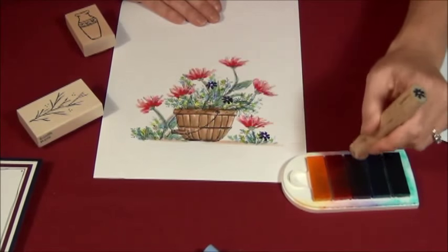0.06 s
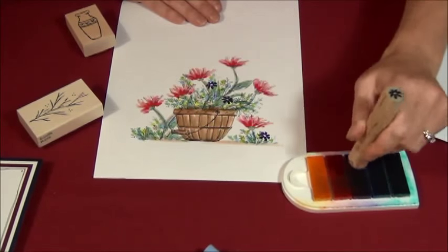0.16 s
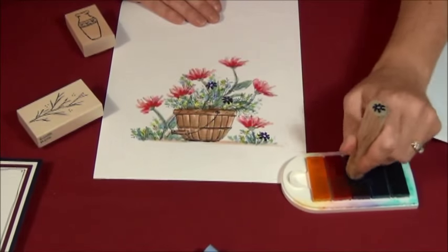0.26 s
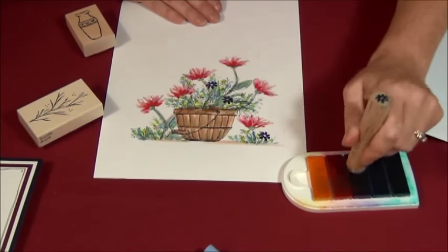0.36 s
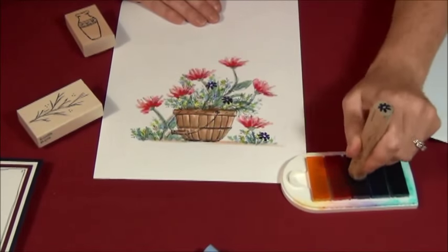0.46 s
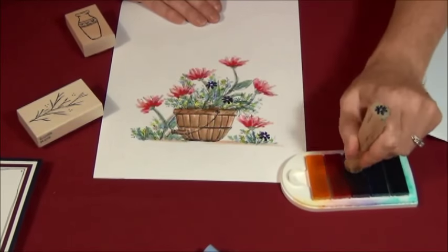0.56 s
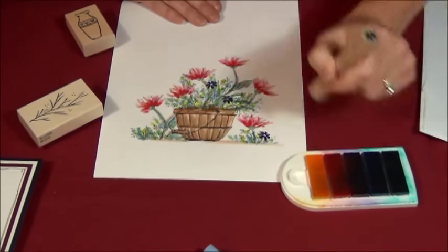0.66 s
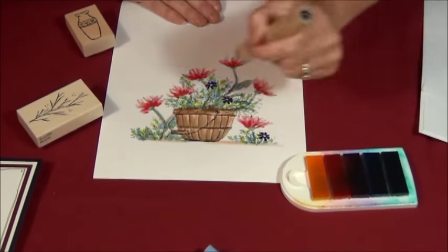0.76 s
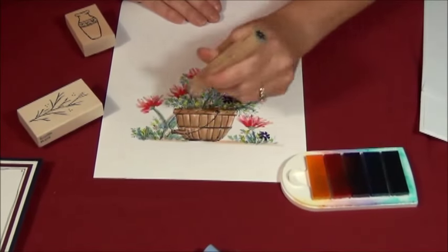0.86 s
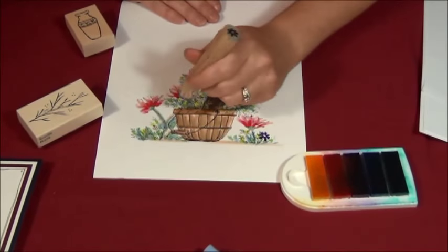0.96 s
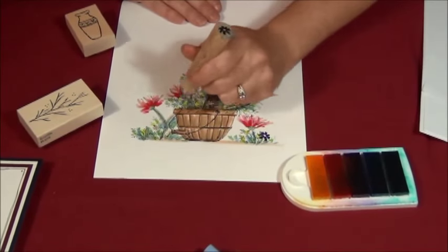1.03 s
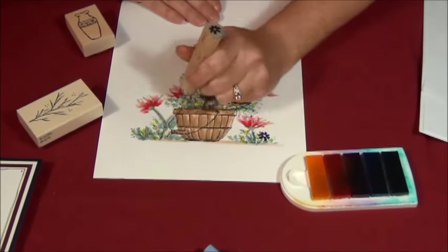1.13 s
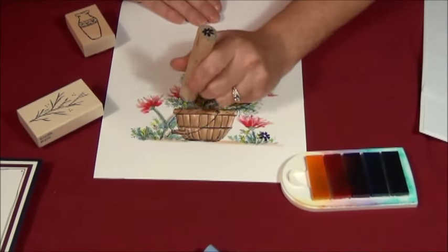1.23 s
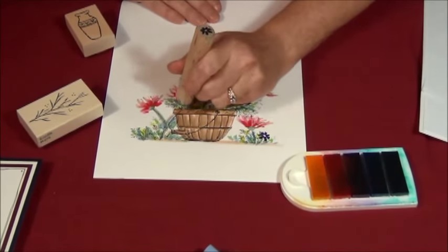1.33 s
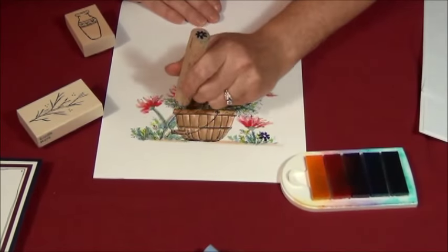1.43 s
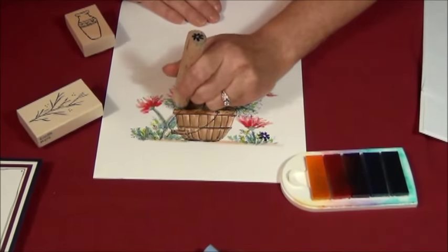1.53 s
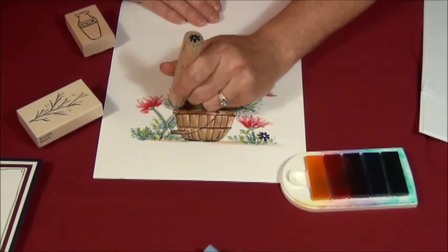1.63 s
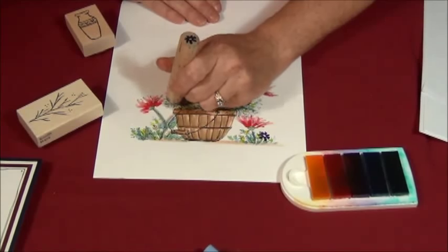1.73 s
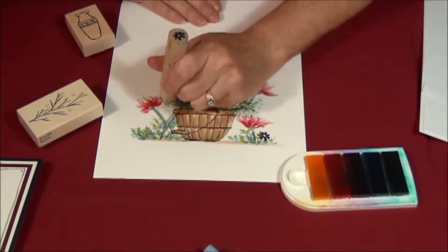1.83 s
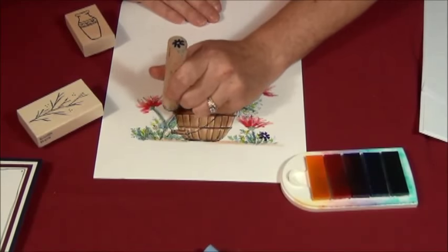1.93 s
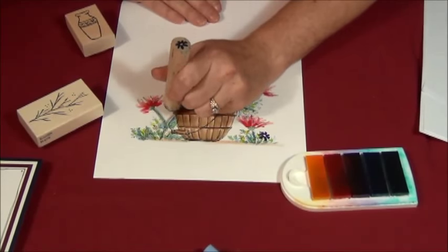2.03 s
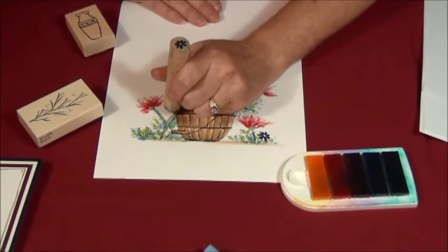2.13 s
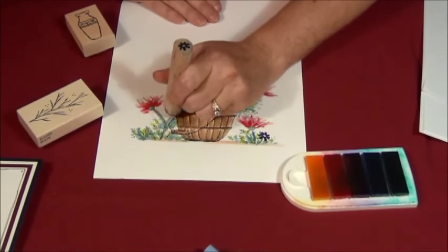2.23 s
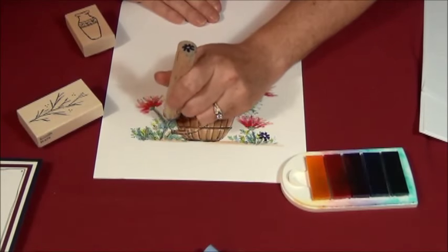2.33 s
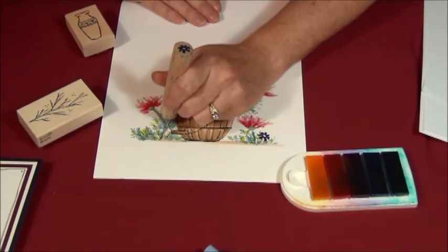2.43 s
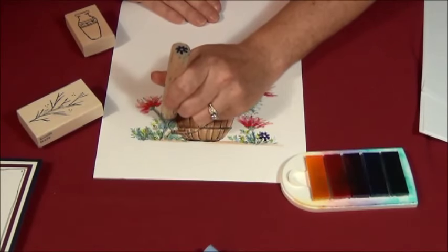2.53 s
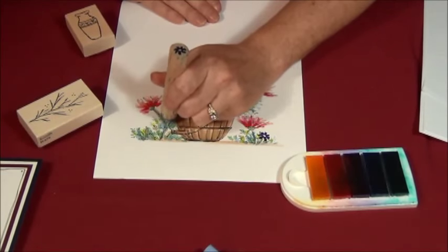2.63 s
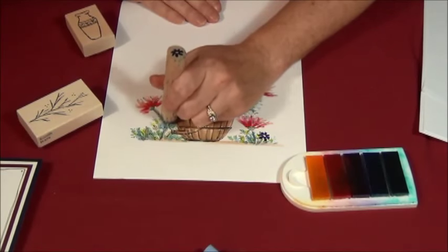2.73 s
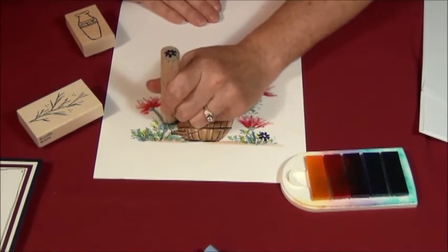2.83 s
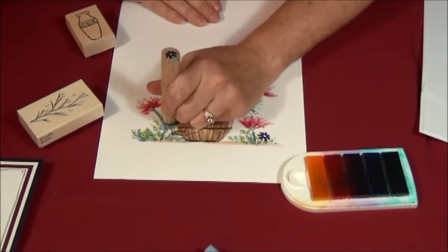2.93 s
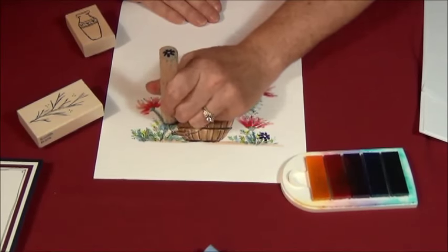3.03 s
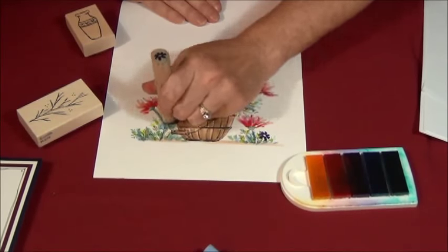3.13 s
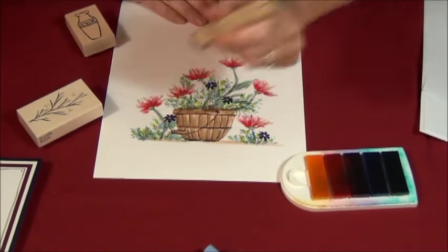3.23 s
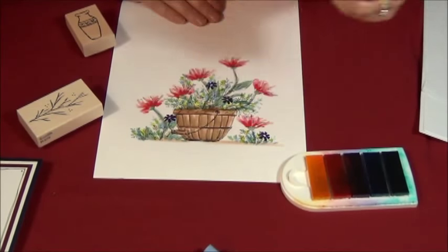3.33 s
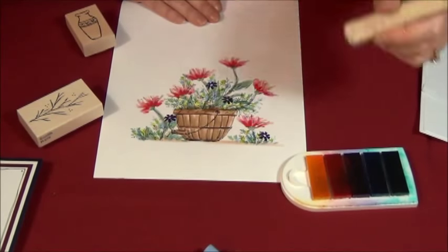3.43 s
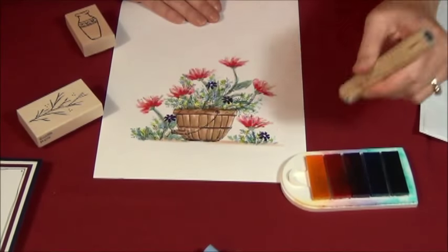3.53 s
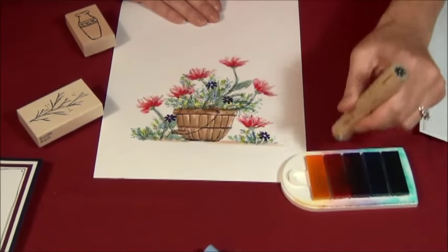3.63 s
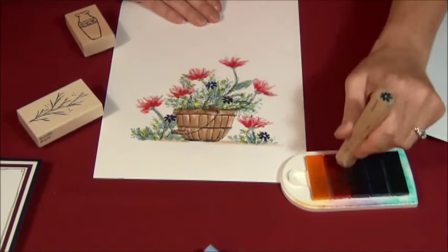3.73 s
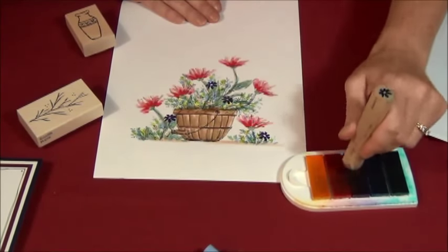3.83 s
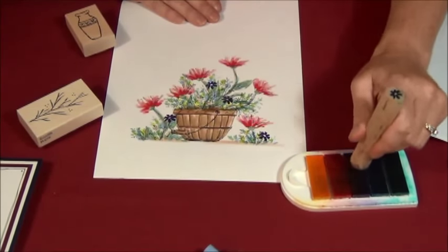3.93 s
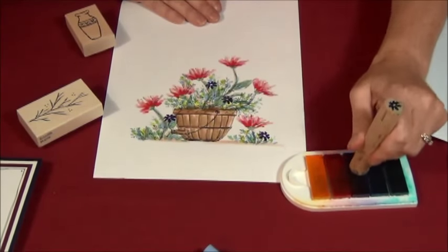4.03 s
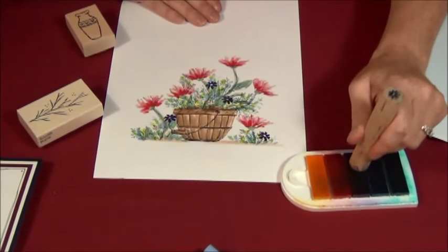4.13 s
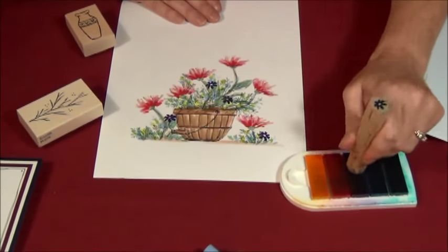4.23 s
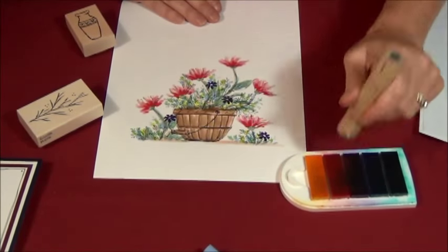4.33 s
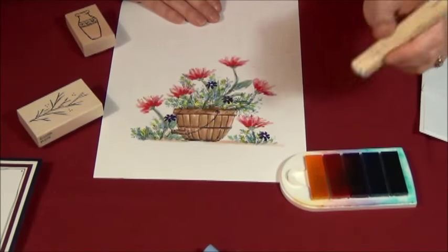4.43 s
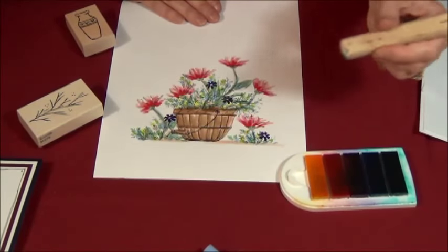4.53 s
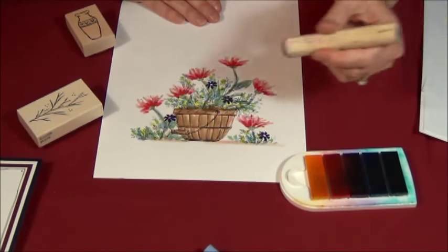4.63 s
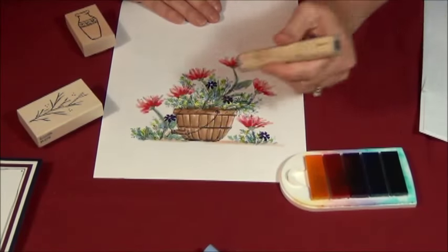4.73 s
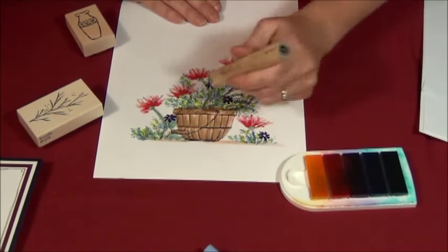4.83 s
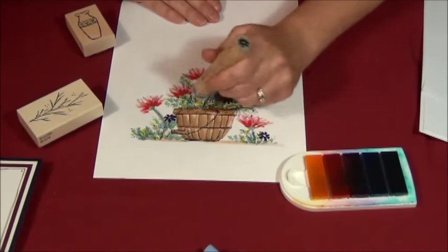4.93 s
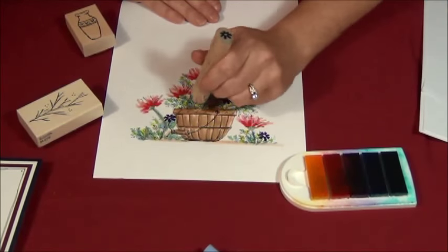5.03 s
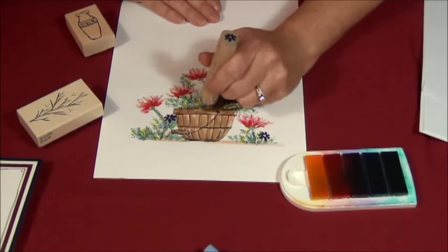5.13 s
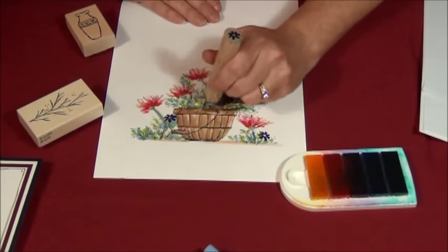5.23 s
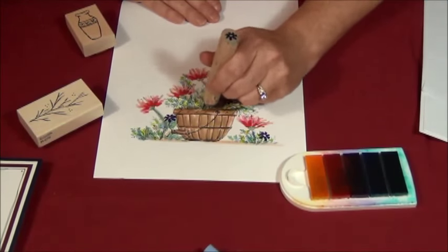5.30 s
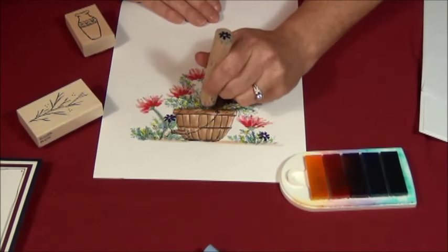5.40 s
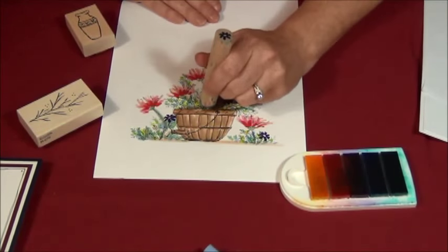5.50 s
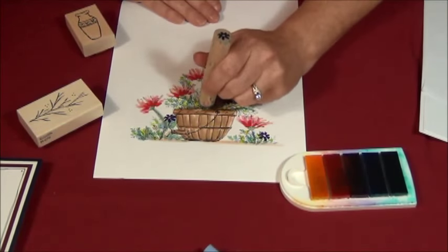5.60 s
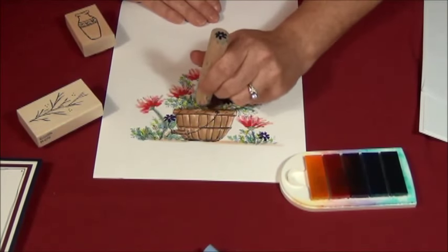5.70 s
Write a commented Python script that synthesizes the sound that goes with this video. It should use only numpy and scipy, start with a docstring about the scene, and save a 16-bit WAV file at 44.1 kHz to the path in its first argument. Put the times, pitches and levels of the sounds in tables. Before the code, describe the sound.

A small wooden stamp taps twice on an ink pad, making its plastic case clack sharply against the table. The stamp is then rocked on card with soft, dull thuds and faint rubbing, and peels off with tiny sticky snaps. Two more quick clacks on the pad follow. The sounds are close, in a small room with a faint electrical hum and ventilation.

```python
"""A small wooden stamp is tapped twice on an ink pad, rocked on a card, peeled off and inked twice more.
Each tap makes the pad's plastic case clack on the table; the tabletop thuds and a small room answers.
Rubber and hand rub softly, and tacky ink snaps as the stamp leaves the card.
Mains hum and ventilation lie underneath; an automatic gain control ducks at the taps and creeps back."""
import sys
import numpy as np
from scipy import signal
from scipy.fft import rfft, irfft, next_fast_len
from scipy.io import wavfile
from scipy.ndimage import uniform_filter1d, minimum_filter1d, map_coordinates

SR = 44100
rng = np.random.default_rng(int(sys.argv[2]) if len(sys.argv) > 2 else 0)


def wav_record(signal):
    """Record a signal, one row per channel, as 16-bit PCM in the file named by sys.argv[1]."""
    frames = np.transpose(np.atleast_2d(signal))
    bounded = np.clip(frames, -1, 1)
    # unit amplitude maps onto the largest positive 16-bit level
    quanta = np.round(bounded * 32767).astype(np.int16)
    wavfile.write(sys.argv[1], SR, quanta)


N = 254016
TIME = np.arange(N) / SR
AGE = TIME[:8192]  # time since a strike [s]

# taps on the ink pad: (time [s], relative level [dB], first touch offset [dB], final slap offset [dB],
# thud centre [Hz], hold until lift [s], relative lift level [dB])
TAPS = [(0.3306, -4.5, -1, 2.5, 140, 0.085, -41), (0.5221, -1.5, -13, -2.5, 144, .098, -35),
        (4.0616, -4, -2.5, 3.5, 225, .092, -46), (4.2467, -1.5, -3, -1.5, 230, 0.087, -32.5)]
# presses on the card, the last one the hand landing by the pad: (time [s], relative level [dB], push centre
# [Hz], # board ring offset [dB], gap between pushes [s], loss per push [dB])
PRESSES = [(2.0292, -23, 255, -2.5, .0085, 5), (2.078, -30, 646, -6, .006, 1.3),
           (2.256, -34.5, 646, -5.5, .008, 2), (2.680, -32.5, 600, -4.5, 0.0065, 6),
           (2.921, -32, 270, 2.5, .008, 10), (3.364, -35, 500, -3, 0.0066, 8),
           (3.687, -26, 280, 0.5, 0.019, 4)]
SETTLED_HZ = 287  # the pushes of a press tend to this centre


def amp(db):
    """Decibels to gain."""
    return 10 ** (np.asarray(db) / 20)


def unit(x):
    """Scale to rms 1."""
    return x / np.sqrt(np.mean(x ** 2) + 1e-20)


def blow(x):
    """Scale to the energy of 1 ms at full level."""
    return x * np.sqrt(SR * 1e-3 / (np.sum(x ** 2) + 1e-20))


def fade(t60_s):
    """Exponential decay, 60 dB down at t60_s."""
    return np.exp(-np.log(1000) * AGE / t60_s)


def along(points, hz):
    """Interpolate (frequency [Hz], value) points on a log axis."""
    points_hz, values = np.transpose(points)
    return np.interp(np.log(hz + 1), np.log(points_hz), values)


def band(hz, centre_hz, steepness_db):
    """Broad hump [dB] around a centre frequency."""
    ratio = (hz + 1) / centre_hz
    return -steepness_db * np.log10(1 + (ratio - 1 / ratio) ** 2)


def filtered(x, response):
    """Multiply the spectrum by a function of frequency."""
    n = x.shape[-1]
    size = next_fast_len(n + SR // 4)
    return irfft(rfft(x, size) * response(np.fft.rfftfreq(size, 1 / SR)), size)[..., :n]


def coloured(x, level_db):
    """Minimum-phase filter from a dB curve: attacks stay sharp."""
    n = 2 * next_fast_len(len(x) // 2 + 1)
    cepstrum = irfft(np.log(amp(level_db(np.fft.rfftfreq(n, 1 / SR))) + 1e-6))
    cepstrum[1:n // 2] *= 2
    cepstrum[n // 2 + 1:] = 0
    return irfft(rfft(x, n) * np.exp(rfft(cepstrum)))[:len(x)]


def delayed(x, s):
    """Fractional-sample delay."""
    return filtered(x, lambda hz: np.exp(-2j * np.pi * hz * s))


def add(track, s, sound):
    """Mix a sound into the track at time s."""
    part = track[round(s * SR):][:len(sound)]
    part += sound[:len(part)]


def diffuse(pair):
    """Two unrelated noises become sound from all around, as two close microphones hear it."""
    # diffuse field: (frequency [Hz], left-right correlation [0..1])
    correlation = [(60, 1), (290, 0.87), (640, 0.68), (1410, 0.41), (3100, 0.57), (6820, 0.55),
                   (15000, 0.95)]
    angle = lambda hz: np.arccos(np.clip(along(correlation, hz), 0, 1)) / 2
    mid, side = filtered(pair, lambda hz: np.array([np.cos(angle(hz)), np.sin(angle(hz))]))
    return np.array([mid + side, mid - side])


def crack(t60_s, scatter_db):
    """One sharp push, then a dense, short ring."""
    push = blow(signal.unit_impulse(len(AGE)))
    return push + amp(scatter_db) * blow(rng.standard_normal(len(AGE)) * fade(t60_s))


def ring(modes, spread_db):
    """Damped modes of alternating sign, struck at slightly random strengths."""
    out = np.zeros(len(AGE))
    for k, (hz, db, t60_s) in enumerate(modes):
        strength = (-1) ** k * amp(db + spread_db * rng.standard_normal())
        out += strength * fade(t60_s) * np.sin(2 * np.pi * hz * AGE)
    return blow(out)


def ventilation():
    """Steady air noise through duct resonances."""
    # air noise spectrum: (frequency [Hz], relative level [dB])
    spectrum = [(25, -13.5), (60, -7), (170, -2), (330, -1.5), (480, -4.5), (750, -3.5), (950, -2.5),
                (1150, -3.5), (1400, -10), (2200, -12), (3150, -10), (4200, -15.5), (8000, -17),
                (15500, -19.5)]
    # duct resonances: (centre [Hz], width [Hz], boost [dB])
    resonances = [(905, 33, 3), (3145, 65, 5)]
    duct_db = lambda hz: sum(db / (1 + (2 * (hz - centre) / width) ** 2)
                             for centre, width, db in resonances)
    noise = diffuse(rng.standard_normal((2, N)))
    air = unit(filtered(noise, lambda hz: amp(along(spectrum, hz) + duct_db(hz))))
    return amp([[-44.5], [-44]]) * air


def mains_hum():
    """Hum lines and a thin electronic whine, wavering slightly in level and phase."""
    # hum and whine lines: (frequency [Hz], relative level [dB])
    lines = [(60, -66), (119.8, -53), (189.5, -59), (240, -54.5), (300, -47), (360.2, -56.5), (540.5, -63),
             (617, -58), (905, -59.5), (933, -58), (15734.3, -62)]

    def wobble(rate_hz):
        return map_coordinates(rng.standard_normal(int(N * rate_hz / SR) + 4), [TIME * rate_hz])

    out = np.zeros(N)
    for hz, db in lines:
        peak = np.sqrt(2) * amp(db + 1.2 * wobble(rate_hz=5.05))
        phase = 2 * np.pi * (hz * TIME + rng.random()) + 0.16 * wobble(rate_hz=5.6)
        out += peak * np.sin(phase)
    return amp(-3) * out


def case_contacts(flat_s=0.0029, skip_s=0.0052, slap_s=0.0066, rattle_gap_s=0.016):
    """Taps rock the case over its corners, lifts rattle it: (time [s], level [dB], tilt [dB/octave])."""
    for s, db, touch_db, slap_db, _, hold_s, lift_db in TAPS:
        yield s, db + touch_db, 1.1
        yield s + flat_s, db, -0.6
        yield s + skip_s, db - 6.5 - slap_db, 1.2  # the skip takes what the slap does not
        yield s + slap_s, db + slap_db, 3.5 + 1.27 * slap_db  # harder is brighter
        for k in (-1, 0, 1):
            rattle_s = s + hold_s + rattle_gap_s * (k + rng.uniform(-0.25, 0.25))
            yield rattle_s, lift_db + rng.normal(1, 1.3), -5


def ink_pad():
    """Every contact cracks the shell of the light plastic case and rings its modes."""
    # case modes: (frequency [Hz], relative level [dB], t60 [s])
    modes = [(1293, -7, 0.05), (1408, -6, 0.065), (2670, -1.5, 0.08), (3520, -2, 0.024), (3790, 5, 0.028),
             (4360, -6, .035), (4700, -9, 0.037), (5480, -4, .045), (6270, 4, 0.044), (6800, -18, 0.081),
             (8100, -2, 0.034), (10640, 7, 0.02)]
    # shell crack spectrum: (frequency [Hz], relative level [dB])
    spectrum = [(60, -25), (250, -6.5), (800, -8.5), (1300, -6.5), (1950, -9.5), (3100, 1.5), (4000, 0.5),
                (6500, -4.5), (8200, -3.5), (9500, -7.5), (11800, -7.5), (13200, -21), (16000, -15.5)]
    out = np.zeros(N)
    case_ring = amp(-15.5) * ring(modes, spread_db=2.0)
    for s, db, tilt_db_per_octave in case_contacts():
        colour_db = lambda hz: along(spectrum, hz) + tilt_db_per_octave * np.log2(hz.clip(1500, 11000))
        shell = blow(coloured(crack(t60_s=0.0081, scatter_db=3), colour_db))
        add(out, s, amp(db) * (shell + case_ring))
    return amp(3.5) * out


def table_pushes(settle_share=0.61):
    """One push per tap, four fading ones per press: (time [s], level [dB], centre [Hz], ring [dB])."""
    for s, db, _, _, thud_hz, _, _ in TAPS:
        yield s + 0.00042, db - 12.5, thud_hz, 3.4
    for s, db, centre_hz, ring_db, gap_s, loss_db in PRESSES:
        for k in range(4):
            push_hz = SETTLED_HZ * (centre_hz / SETTLED_HZ) ** (settle_share ** k)
            yield s + k * gap_s, db - k * loss_db, push_hz, ring_db


def tabletop(cutoff_hz=1050):
    """A cushioned push thuds and rings the board; the softer the contact, the lower the thud."""
    # board modes: (frequency [Hz], relative level [dB], t60 [s])
    modes = [(92, -8.5, 0.063), (134.6, 1, 0.11), (166, -9.5, 0.21), (240.6, -8, 0.17), (287.4, 1, 0.092),
             (339.4, 0.5, 0.11), (458.4, -3, 0.13), (638, -1.5, 0.12), (805, -26, 0.035), (990, -2, 0.052)]
    lowpass_db = lambda hz: -10 * np.log10(1 + (hz / cutoff_hz) ** 4)
    out = np.zeros(N)
    for s, db, centre_hz, ring_db in table_pushes():
        knock = blow(coloured(crack(t60_s=0.072, scatter_db=5), lowpass_db))
        board = knock + amp(ring_db) * ring(modes, spread_db=-0.5)
        thud = blow(coloured(board, lambda hz: band(hz, centre_hz, steepness_db=9.0)))
        add(out, s, amp(db) * thud)
    return amp(7.0) * out


def slides(scuff_s=0.008):
    """Rubs, scuffs, scrapes and sways: (mid time [s], length [s], level [dB], centre [Hz])."""
    # rubber and hand on card and cloth: (mid time [s], length [s], level [dB], centre [Hz])
    rubs = [(0.916, 0.045, -49.5, 8000), (1.8, 0.24, -48, 447), (1.81, 0.044, -51.5, 7000),
            (2.04, 0.076, -50, 60), (2.877, .06, -53, 65), (5.23, 0.11, -50, 7960)]
    yield from rubs
    for s, db, centre_hz, *_ in PRESSES:
        scuff_db = db - 20.5 + 8 * np.log2(centre_hz / SETTLED_HZ)  # a harder, higher push scuffs louder
        yield s + scuff_s / 2, scuff_s, scuff_db, 1770  # the rubber lands
    for s, *_, hold_s, lift_db in TAPS:
        yield s + hold_s, 0.054, lift_db - 6, 2240  # the case scrapes at the lift
        yield s + hold_s, 0.068, -46, 36  # the table sways back


def rubbing():
    """Each slide is a swell of fine grains: hiss on paper, rumble where the hand drags the table."""
    out = np.zeros(N)
    t = TIME[:SR // 2]
    for s, length_s, db, centre_hz in slides():
        grains = rng.standard_normal(len(t)) * rng.exponential(size=len(t))
        friction = unit(coloured(grains, lambda hz: band(hz, centre_hz, steepness_db=12.5)))
        swell = np.exp(-2 * ((t - t.mean()) / length_s) ** 2)
        add(out, s - t.mean(), amp(db) * friction * swell)
    return out


def sticky_ink(threads=3, gap_s=0.0039, step_db=7.5):
    """Ink threads break in a quick crescendo of dry snaps as the rubber peels off the card."""
    # last, loudest snap of each peel: (time [s], level [dB])
    snaps = [(1.9856, -37), (2.8425, -38), (3.11, -35), (3.2387, -22)]
    # snap spectrum: (frequency [Hz], relative level [dB])
    spectrum = [(100, -19), (1000, -12), (2000, -5.5), (3300, 2), (6000, -9.5), (11000, -7), (13000, -9),
                (16000, -27.5)]
    out = np.zeros(N)
    for s, db in snaps:
        for k in range(threads):
            snap = blow(coloured(crack(t60_s=0.021, scatter_db=-1.5), lambda hz: along(spectrum, hz)))
            add(out, s - k * gap_s, amp(db - k * step_db) * snap)
    return out


def room(x, block=SR // 2):
    """Diffuse tail, new each block as the hand moves; it builds quickly and dies fastest in the treble."""
    # room decay: (frequency [Hz], t60 [s])
    decay_times = [(100, 0.41), (700, 0.35), (2000, 0.29), (4800, 0.31), (8000, 0.22), (13000, 0.21)]
    # tail spectrum: (frequency [Hz], relative level [dB])
    spectrum = [(100, -8), (400, 1), (1500, 4.5), (3500, -2), (8000, -2), (13000, -6.5)]
    build_up = 1 - np.exp(-TIME[:block] / 0.0043)
    near_walls = 1 + 0.5 * np.exp(-TIME[:block] / 0.04)
    out = np.zeros((2, N))
    for start in range(0, N, block):
        part = x[None, start:start + block]
        if not part.any():
            continue
        hz, t, noise = signal.stft(rng.standard_normal((2, block)), SR, nperseg=256)
        decay = np.exp(-np.log(1000) * t / along(decay_times, hz)[:, None])
        colour = amp(along(spectrum, hz))[:, None]
        tail = signal.istft(noise * decay * colour, SR)[1][:, :block] * build_up * near_walls
        tail /= np.linalg.norm(tail[0])
        for track, sound in zip(out, signal.fftconvolve(part, tail, axes=1)):
            add(track, start / SR, sound)
    return out


def clack_reverb(directions=3):
    """The case sends a different ring in each direction; the room blends them into one smooth tail."""
    return sum(room(ink_pad()) for _ in range(directions)) / np.sqrt(directions)


def gain_control(x, ceiling_db, start_db, recovery_db_per_s):
    """The gain drops just ahead of a loud sound and climbs back slowly."""
    power = np.abs(uniform_filter1d(np.mean(x ** 2, axis=0), size=600))
    headroom_db = ceiling_db - 10 * np.log10(power + 1e-12)
    allowed_db = minimum_filter1d(np.minimum(headroom_db, 0), size=900)
    allowed_db[0] = start_db
    climb_db = recovery_db_per_s * TIME
    gain_db = np.minimum.accumulate(allowed_db - climb_db) + climb_db
    return x * amp(uniform_filter1d(gain_db, size=200))


def limiter(x, ceiling_db):
    """Turn down the loudest milliseconds."""
    level = np.sqrt(np.abs(uniform_filter1d(np.mean(x ** 2, axis=0), size=90)))
    gain = np.minimum(amp(ceiling_db) / (level + 1e-9), 1)
    return x * uniform_filter1d(gain, size=60)


def scene():
    """Pad slightly right, card in the middle; a near wall echoes once."""
    pad = ink_pad()
    card = tabletop() + sticky_ink() + rubbing()
    direct = np.array([amp(-1.0) * delayed(pad, s=5e-6), amp(1.0) * pad]) + card
    wall_echo = amp(-13.5) * delayed(pad + card, s=0.0097)
    tails = diffuse(amp(-11.5) * clack_reverb() + amp(-12.0) * room(card))
    return direct + wall_echo + tails + ventilation() + mains_hum()


def record(dry):
    """Gain control, limiter, soft clip and a steep low-pass."""
    cutoff_hz = 15920
    x = gain_control(dry, ceiling_db=-13.0, start_db=-3, recovery_db_per_s=2.5)
    x = limiter(x, ceiling_db=-12.0)
    clipped = x / (1 + x ** 6) ** (1 / 6)
    return filtered(clipped, lambda hz: 1 / np.sqrt(1 + (hz / cutoff_hz) ** 240))


dry = scene()
out = record(dry)
wav_record(out)
```